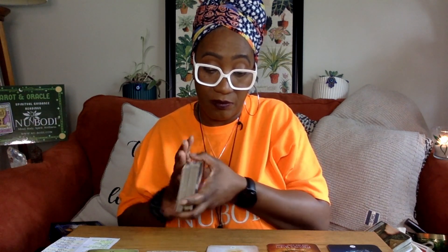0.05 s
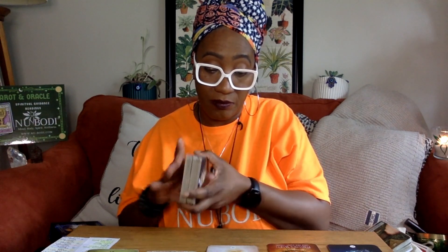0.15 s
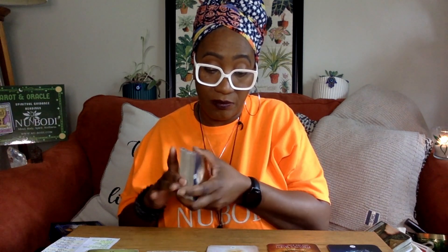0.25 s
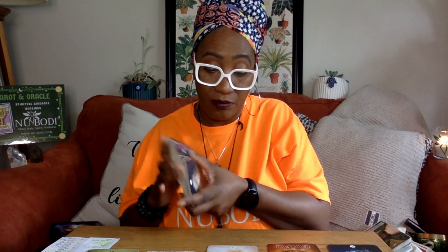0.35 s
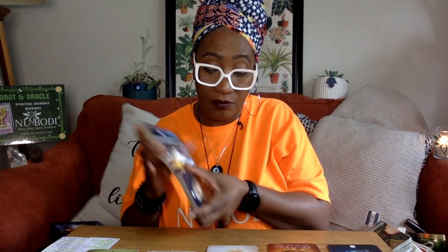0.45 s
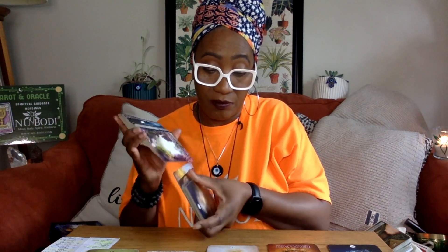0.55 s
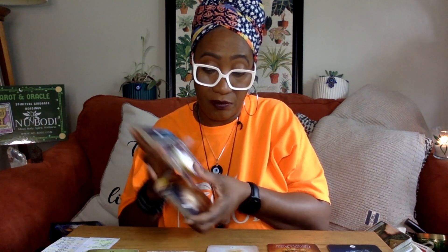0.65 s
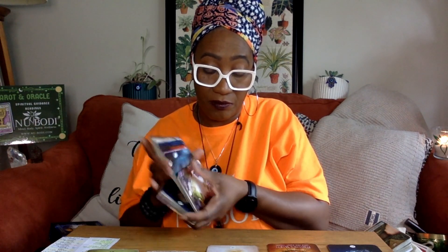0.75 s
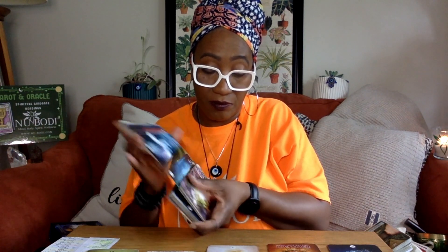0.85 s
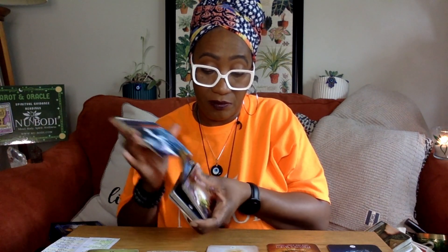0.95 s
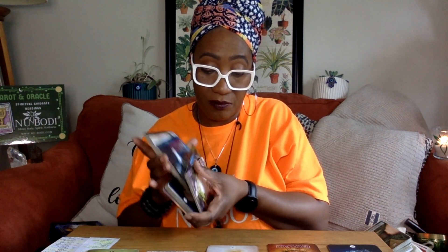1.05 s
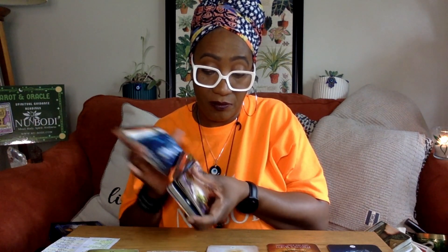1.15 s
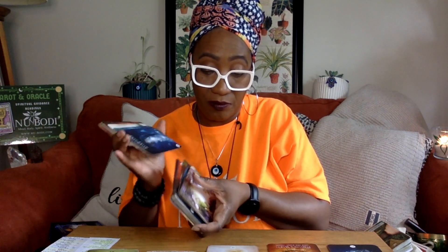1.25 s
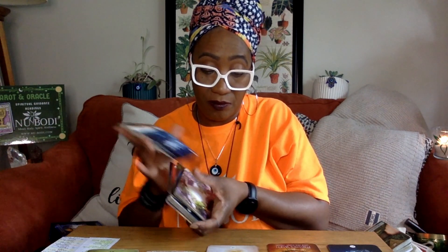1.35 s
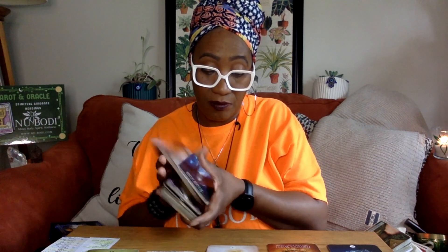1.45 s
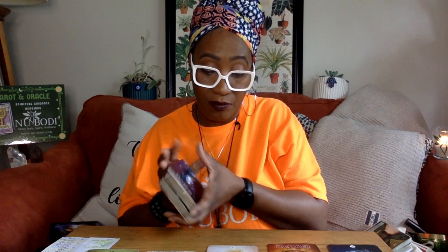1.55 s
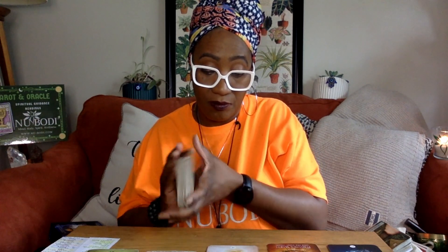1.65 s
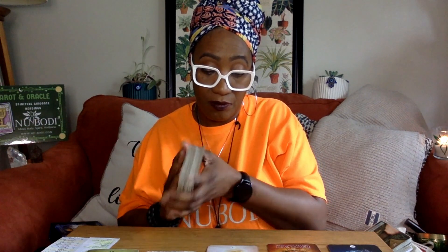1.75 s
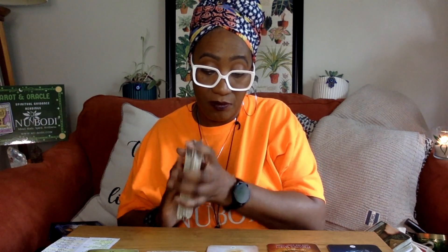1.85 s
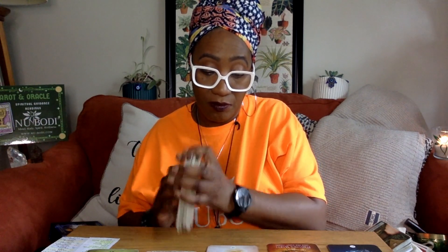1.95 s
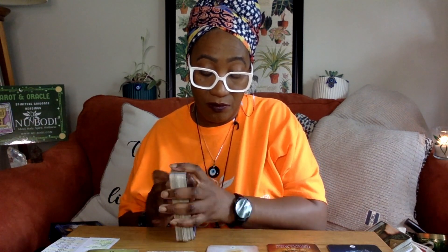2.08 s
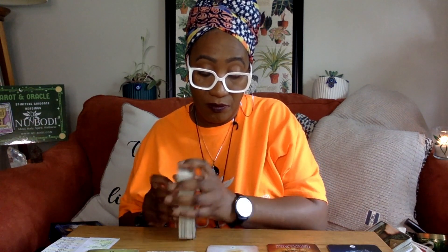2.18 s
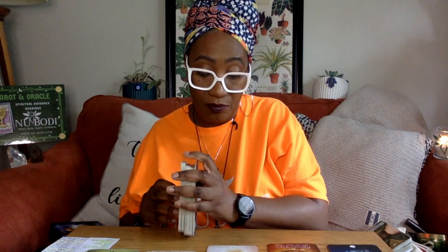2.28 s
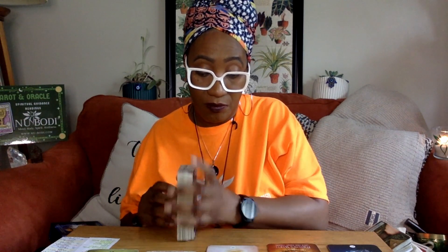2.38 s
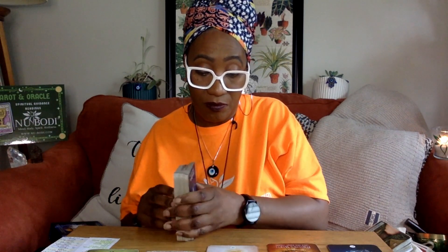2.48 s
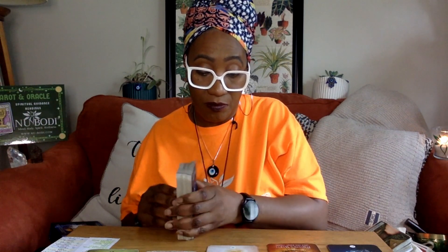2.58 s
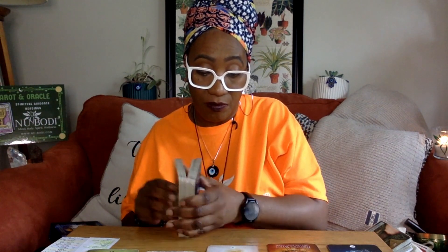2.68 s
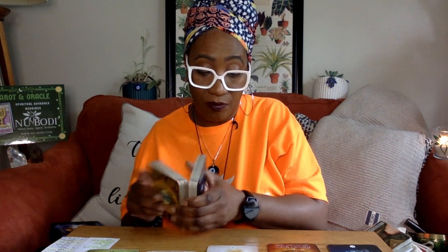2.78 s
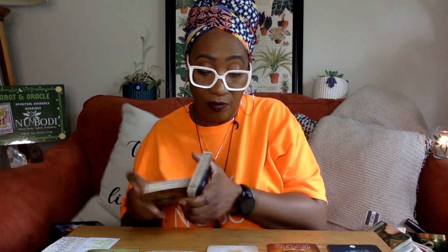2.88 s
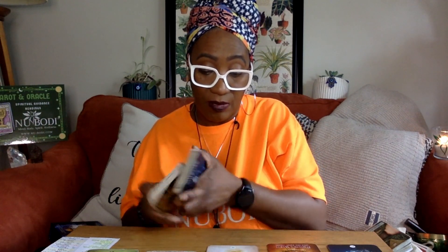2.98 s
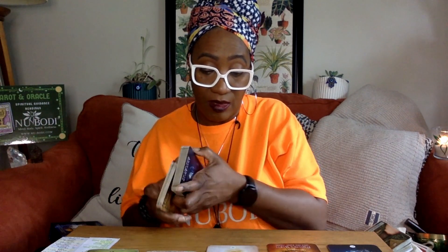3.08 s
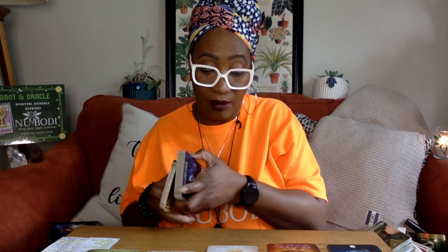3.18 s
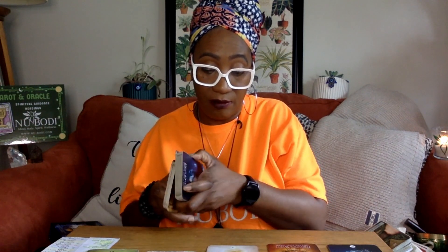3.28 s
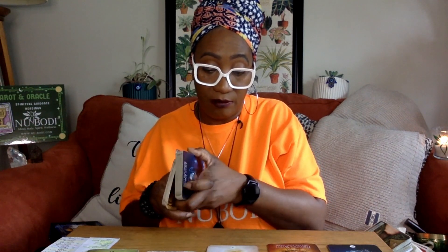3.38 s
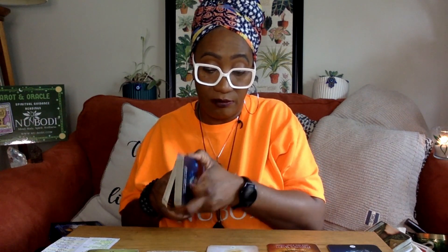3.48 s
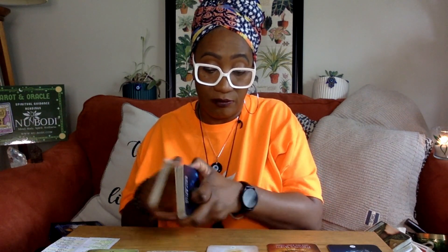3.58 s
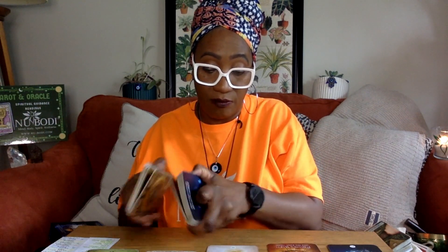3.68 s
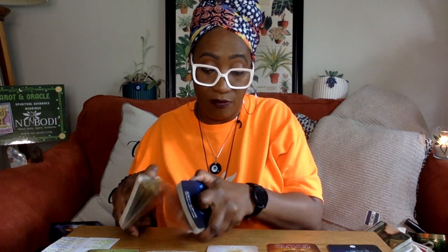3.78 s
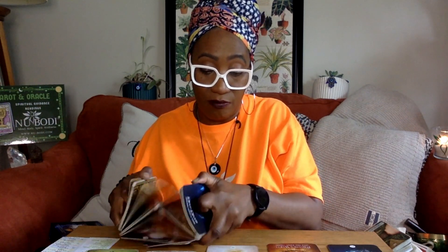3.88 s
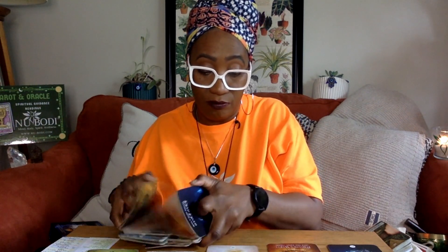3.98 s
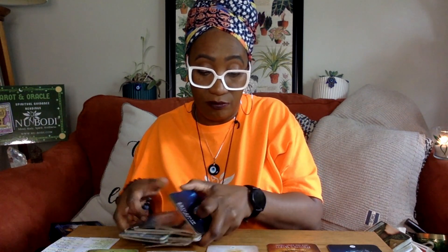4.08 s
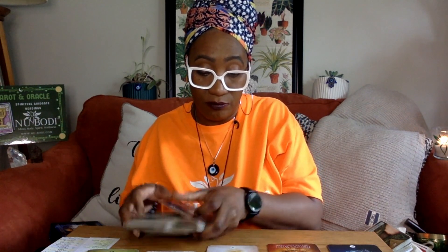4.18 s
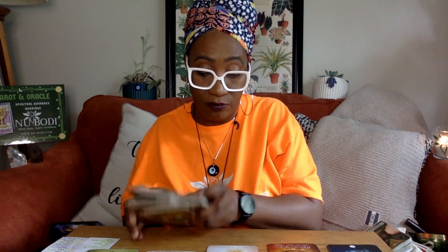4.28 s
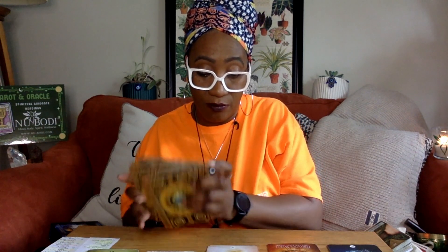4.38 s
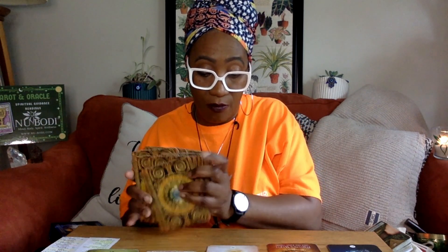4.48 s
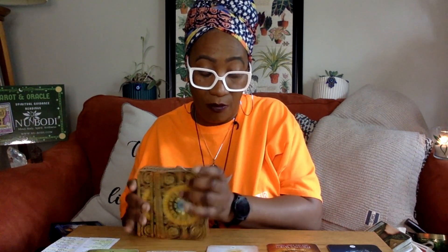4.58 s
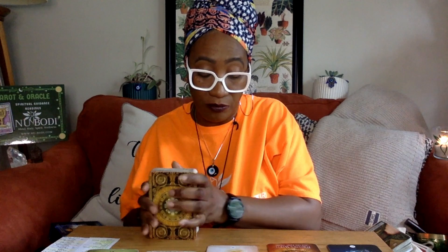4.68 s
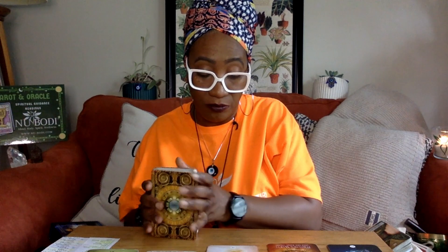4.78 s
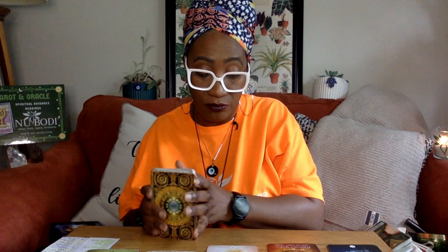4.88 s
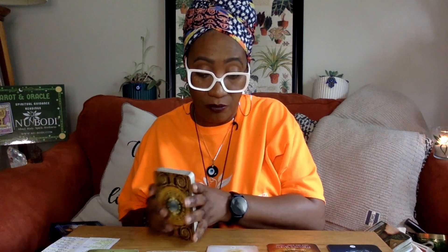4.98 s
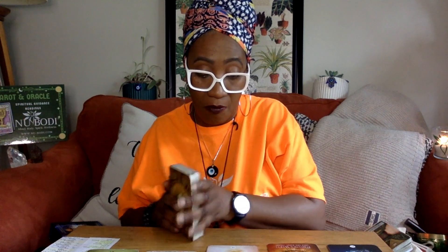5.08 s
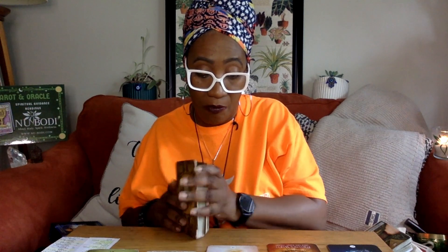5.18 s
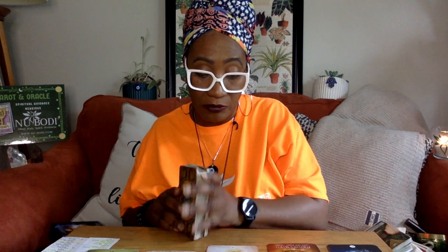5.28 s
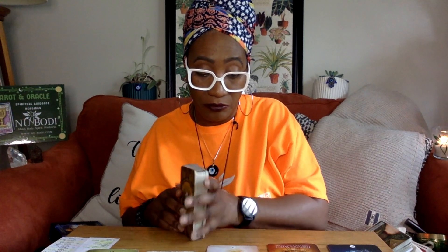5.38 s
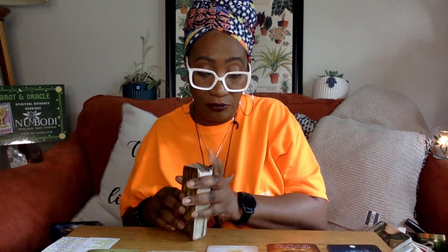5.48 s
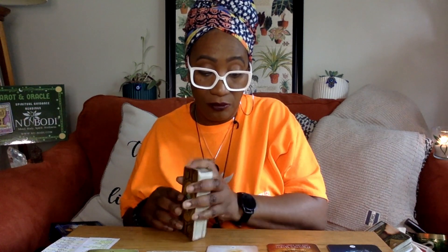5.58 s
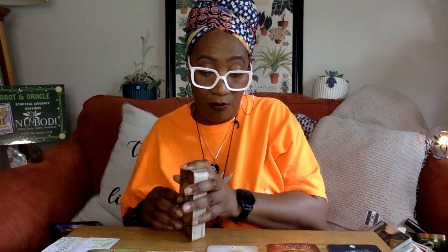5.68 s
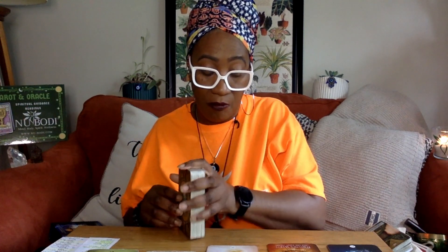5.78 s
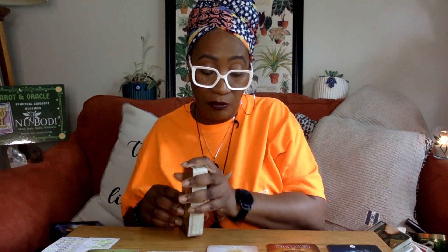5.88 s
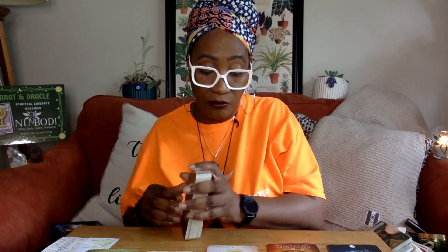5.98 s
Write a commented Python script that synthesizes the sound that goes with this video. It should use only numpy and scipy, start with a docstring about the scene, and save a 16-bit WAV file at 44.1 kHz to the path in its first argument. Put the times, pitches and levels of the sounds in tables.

```python
"""In a small furnished room, a deck of large cards is shuffled in the hands and knocked on a wooden table.
Sliding cards are noise shaped into a papery scrape and a high fizz, and snapping corners are short sines
with a flutter and a tick. Each knock is a burst of noise grains, many edges landing within moments,
that rings the table top. The room answers with echoes, over a faint hum, rumble and microphone hiss."""
import sys
import numpy as np
from scipy import signal
from scipy.fft import rfft, irfft
from scipy.io import wavfile
from scipy.ndimage import uniform_filter1d

SR = 44100
rng = np.random.default_rng(int(sys.argv[2]) if len(sys.argv) > 2 else 0)


def file_out(sig):
    """Save sig as 16-bit WAV at sys.argv[1]."""
    # one column per channel
    cols = np.atleast_2d(sig).T
    # limit, then scale
    lim = np.clip(cols, -1, 1)
    pcm = np.round(lim * 32767).astype(np.int16)
    wavfile.write(sys.argv[1], SR, pcm)


N = 266754  # length of the scene [samples]

# tone of cards rubbing, low and high part: (frequency [Hz], relative level [dB])
SCRAPE_TONE = [(180, -33), (300, -2.5), (387, -7), (846, -7.5), (2200, -6.5), (4500, -5), (6550, -20.5),
               (7500, -22.5), (9750, -91), (16500, -120)]
FIZZ_TONE = [(3820, -44), (6500, -21), (9620, -9.5), (10600, -8.5), (15100, -5), (16000, -8.5)]
# strokes of cards over cards or fingers: (time of the height [s], rise [s], fall [s], scrape level [dB],
# fizz level [dB], ringing pitch of the gap between cards [Hz], hollowness [0-1])
CARD_STROKES = [(0, .01, 0.018, -45.5, -56, 2100, 0.53), (.085, 0.13, 0.067, -70.5, -59.5, 2000, 0.2),
                (.18, .025, .025, -78, -66, 1550, .5), (.24, .03, 0.028, -71, -60.5, 1270, .5),
                (.38, .02, .05, -62, -63, 1250, 0.7), (.425, 0.044, 0.044, -59.5, -57.5, 1077, 0.5),
                (.462, .03, 0.025, -59, -57.5, 1900, 0.86), (.538, 0.071, 0.024, -80, -57, 1350, .5),
                (0.598, 0.0052, 0.013, -50.5, -55, 2080, 0.03), (.712, 0.0066, 0.028, -54, -55, 1130, 0.6),
                (.775, .02, 0.031, -54.5, -56, 2005, 0.07), (.87, 0.049, 0.061, -80, -62.5, 1300, .6),
                (.995, 0.026, .06, -72, -62.5, 1400, 0.4), (1.15, 0.051, 0.04, -62, -57.5, 2100, 0.1),
                (1.45, .012, 0.036, -59, -57.5, 2560, 0.5), (1.497, 0.018, 0.052, -51.5, -50, 2280, 0.2),
                (1.54, 0.029, 0.02, -51, -65, 2226, 0.56), (1.69, 0.11, 0.066, -66, -59.5, 2200, 0),
                (1.745, 0.026, 0.039, -66.5, -63, 1790, 0.1), (1.92, 0.071, .1, -70.5, -65, 1220, .5),
                (2.05, 0.013, 0.042, -45, -56, 1970, 0.4), (2.24, 0.043, 0.35, -73.5, -73, 1200, 0.7),
                (2.845, 0.033, 0.033, -62, -60, 2400, 0.2), (2.915, 0.0093, 0.031, -56.5, -62, 2400, 0.25),
                (3.015, 0.094, 0.037, -60.5, -58, 2300, 0.4), (3.075, .03, 0.044, -71, -61, 1440, .5),
                (3.255, 0.044, 0.02, -66.5, -65, 2700, .8), (3.37, .02, .04, -66, -78, 1510, 1),
                (3.45, 0.022, 0.071, -63.5, -58, 3530, 0.4), (3.74, 0.072, .04, -69.5, -77, 1900, .5),
                (3.815, 0.026, 0.045, -60.5, -63, 1950, 0.5), (4.23, 0.12, 0.087, -57.5, -61.5, 2200, 0.06),
                (4.31, 0.054, 0.081, -79, -62, 2570, 0.3), (4.435, 0.065, 0.053, -57.5, -56, 2300, .2),
                (4.61, 0.053, 0.058, -56.5, -53.5, 2000, .4), (4.72, 0.03, 0.03, -47, -51, 2240, 0.7),
                (4.815, .03, 0.04, -79, -60.5, 2000, .4), (5.015, 0.087, 0.06, -68, -61.5, 2000, 0.2),
                (5.19, 0.24, 0.062, -70, -67.5, 2010, .5), (5.27, .02, 0.032, -57, -76.5, 900, 0.86),
                (5.982, .008, .04, -64, -77.5, 2020, .5)]


def gain_of(db):
    """Turns decibels into a factor for the wave."""
    return 10 ** (np.asarray(db) / 20)


def evened(x):
    """Scales to an average (rms) strength of 1."""
    return x / np.sqrt(np.mean(x ** 2) + 1e-20)


def unit(x):
    """Scales to energy 1."""
    return x / np.linalg.norm(x)


def read(points, hz):
    """Reads a table at any frequency, with pitch spaced as the ear hears it (logarithmic)."""
    f, value = np.transpose(points)
    return np.interp(np.log(hz + 1), np.log(f + 1), value)


def add(mix, s, sound):
    """Adds a sound to the mix at s seconds, cut off at the end of the mix."""
    part = mix[round(s * SR):][:len(sound)]
    part += sound[:len(part)]


def colour(points, size=4096):
    """Makes a filter with the given tone and energy 1; it never sounds ahead of its input."""
    hz = abs(np.fft.fftfreq(size, 1 / SR))
    log_gain = np.log(gain_of(np.maximum(read(points, hz), -100)))
    # this phase packs the energy as early as possible
    phase = -signal.hilbert(log_gain).imag
    taps = np.fft.ifft(np.exp(log_gain + 1j * phase)).real[:size // 2]
    return unit(taps)


def grains(size, spread_db):
    """Noise whose samples differ in size by spread_db: the wider, the more like a rain of tiny clicks."""
    boost_db = spread_db * np.minimum(rng.exponential(1, size), 5)
    return evened(rng.standard_normal(size) * gain_of(boost_db))


def resonate(x, hz, width):
    """A resonance of gain 1: shifts the pitch hz (fixed or moving) to zero, smooths, and shifts back."""
    turn = np.exp(2j * np.pi * np.cumsum(hz * np.ones(len(x))) / SR)
    r = np.exp(-np.pi * width / SR)
    smooth = signal.lfilter([1 - r], [1, -r], x / turn + 1e-18)
    return 2 * (turn * smooth).real


def floor():
    """Room rumble and microphone hiss are shaped noise; hum tones are sines, the higher wavering more."""
    # tone of rumble and hiss: (frequency [Hz], relative level [dB])
    floor_tone = [(15, -4.5), (30, -1), (42, -4.5), (52, -10.5), (80, -1), (135, -1), (163, -15),
                  (234, -10.5), (350, -11.5), (430, -19.5), (720, -23.5), (1150, -16), (1400, -26.5),
                  (2200, -24.5), (4000, -27.5), (7310, -35.5), (10000, -30), (13500, -24.5), (16000, -23.5)]
    # hum tones: (frequency [Hz], level around which it wavers [dB rms])
    hum_tones = [(26.9, -71), (59.2, -64), (119, -83), (242.2, -76)]
    floor_db = -59  # rms
    t = np.arange(N) / SR
    spectrum = rfft(rng.standard_normal(N))
    hiss = irfft(spectrum * gain_of(read(floor_tone, np.fft.rfftfreq(N, 1 / SR))), N)
    hum = np.zeros(N)
    for hz, db in hum_tones:
        waver_db = hz / 100 * evened(uniform_filter1d(rng.standard_normal(N), size=8000))
        sine = np.sin(2 * np.pi * (hz * t + rng.random()))
        hum += np.sqrt(2) * gain_of(db + waver_db) * sine
    return gain_of(floor_db) * evened(hiss) + hum


def room(x):
    """Walls send back many echoes: sparse taps of random sign, each band dying at its own speed."""
    # (frequency [Hz], time to die away by 60 dB [s])
    room_decay = [(200, 0.32), (600, 0.33), (1300, 0.38), (1750, 0.25), (2150, 0.33), (2700, 0.3),
                  (4000, 0.27), (10000, 0.19)]
    taps = np.zeros(SR // 2)
    # one echo at a random place in every 20 samples
    at = np.arange(100, len(taps) - 20, 20)
    taps[at + rng.integers(0, 20, len(at))] = rng.choice([-1., 1.], len(at))
    hz, t, z = signal.stft(taps, SR, nperseg=256)
    fade = gain_of(-60 * t / read(room_decay, hz)[:, None])
    tail = signal.istft(z * fade, SR, nperseg=256)[1]
    return signal.fftconvolve(x, unit(tail))[:N]


def pressure(t):
    """Gain of scrape and fizz: each stroke swells to its height and dies away; the cascade joins them."""
    # half the deck spilling onto the table: (time [s], scrape level [dB], fizz level [dB])
    cascade = [(3.848, -70, -68), (3.853, -53, -48), (3.89, -46.5, -51), (3.924, -43.5, -48.5),
               (3.954, -53, -55), (3.967, -40.5, -45), (3.987, -46.5, -50), (4.022, -47.5, -49),
               (4.036, -44.5, -48), (4.06, -46, -47.5), (4.088, -40, -42.5), (4.136, -55.5, -58.5),
               (4.18, -59, -62)]
    drop_db = 11  # level lost over one rise or fall time
    s, *levels_db = np.transpose(cascade)
    gains = [gain_of(np.interp(t, s, db, -200, -200)) for db in levels_db]
    for s, rise, fall, *levels_db in np.array(CARD_STROKES)[:, :-2]:
        # distance from the height, counted in rise or fall times
        away = np.maximum((s - t) / max(rise, .002), (t - s) / max(fall, .002))
        strokes = [gain_of(db - drop_db * away) for db in levels_db]
        gains = [np.hypot(gain, stroke) for gain, stroke in zip(gains, strokes)]
    return gains


def sliding():
    """Card faces catch and slip: a low scrape and a high fizz that flicker together."""
    t = np.arange(N) / SR
    coarse = np.arange(0, N, 32) / SR
    scrape_gain, fizz_gain = (np.interp(t, coarse, gain) for gain in pressure(coarse))
    s, *_, gap_hz, hollow = np.transpose(CARD_STROKES)
    gap_hz = np.interp(t, s, gap_hz)
    hollow = np.clip(np.interp(t, s, hollow), 0, 1)

    # random flicker of 3 dB rms
    catch = gain_of(3 * evened(uniform_filter1d(rng.standard_normal(N), size=250)))
    rub = grains(N, spread_db=5.0) * catch
    rub = evened(signal.oaconvolve(rub, colour(SCRAPE_TONE))[:N])
    # the air between the cards rings
    wedge = resonate(rub, gap_hz, width=1200)
    wedge = resonate(wedge, gap_hz, width=1200)
    scrape = np.sqrt(1 - hollow) * rub + np.sqrt(hollow) * evened(wedge)

    # the fizz flickers less
    fizz = grains(N, spread_db=3.5) * catch ** 0.28
    fizz = evened(signal.oaconvolve(fizz, colour(FIZZ_TONE))[:N])
    return scrape * scrape_gain, fizz * fizz_gain


def snaps():
    """A bent card lets go: a few cycles of flexing, with a brief flutter and a crisp edge tick at once."""
    # (time [s], flex level [dB], pitch [Hz], edge tick level [dB], cycles of ring)
    card_snaps = [(.5886, -33, 2000, -42, .7), (.7032, -40, 1060, -53, 1.2), (.762, -48, 3800, -58, 1.2),
                  (1.1233, -55, 2140, -52, 1.2), (1.439, -50, 3000, -58, 1.2),
                  (1.4905, -33, 2300, -44, 1.1), (1.5338, -35, 2700, -56, 1.5),
                  (1.5413, -39, 1600, -58, 1.5), (2.387, -40, 4000, -54, .8), (2.417, -40, 3600, -60, 2),
                  (2.846, -52, 2600, -62, 1.2), (2.914, -52, 2800, -60, 1.5), (2.9665, -38, 2010, -56, 1.2),
                  (3.238, -52, 2600, -60, 1.2), (3.259, -48, 1900, -66, 2), (3.277, -58, 2500, -46, .9),
                  (3.8491, -16, 3300, -27, 1.6), (3.8657, -8.5, 2300, -38, 1.0),
                  (3.9606, -27, 2250, -40, 2.5), (3.9786, -38, 2300, -38, 1.3),
                  (4.0295, -32, 1900, -40, 1.3), (4.0705, -32, 2190, -42, 4), (4.0832, -27, 2460, -44, 2.5),
                  (4.4307, -27, 2280, -45, 4), (4.431, -29, 2900, -60, 4), (4.8253, -13, 1800, -56, .5)]
    # flutter level at a 0 dB snap, dB of flutter per dB of snap, and its fading time
    flutter_db, flutter_growth, flutter_s = -31.5, 0.38, 0.0021
    out, t = np.zeros(N), np.arange(1500) / SR
    scrape, fizz = colour(SCRAPE_TONE), colour(FIZZ_TONE)
    for s, db, hz, edge_db, cycles in card_snaps:
        onset = 1 - np.exp(-t / .0001)
        flex = np.sin(2 * np.pi * hz * t) * np.exp(-t * hz / max(cycles, .3)) * onset
        rattle = signal.fftconvolve(rng.standard_normal(1500), scrape)[:1500]
        flutter = evened(rattle + resonate(rattle, hz, width=5400)) * np.exp(-t / flutter_s)
        burst = rng.standard_normal(1500) * np.exp(-t / 0.0016)
        tick = signal.fftconvolve(burst, fizz)[:1500]
        flutter_gain = gain_of(flutter_db + flutter_growth * db)
        add(out, s, gain_of(db) * flex + flutter_gain * flutter + gain_of(edge_db) * tick)
    return out


def ringing(modes, t):
    """A struck board rings at several pitches: one row of dying sine for each."""
    return np.array([gain_of(db - 60 * t / t60) * np.sin(2 * np.pi * hz * t) for hz, db, t60 in modes])


def knocks():
    """Card edges land in a quick clatter that rings the table, and the table sways."""
    # (time [s], clatter level [dB], rise [s], landing spread [s], deck ring [Hz],
    # edge crackle over the clatter level [dB], thud peak [dB], thud centre [Hz], low boom [dB])
    deck_knocks = [(1.571, -72, .002, 0.0093, 1200, -13, -48.5, 330, -64.5),
                   (2.0344, -20.5, 0.0025, .015, 1950, -15.5, -22.5, 380, -70),
                   (2.049, -22.5, .004, 0.018, 2020, -21, -26.5, 338, -41.5),
                   (2.067, -37, .003, 0.012, 2250, -28, -33, 357, -70.5),
                   (2.33, -71, 0.01, 0.062, 702, -18, -50, 300, -62),
                   (2.387, -36, 0.00059, 0.018, 1010, -16, -40.5, 300, -47.5),
                   (2.415, -36, 0.0011, 0.026, 2000, -21, -38, 241, -50.5),
                   (3.851, -38.5, .001, 0.02, 1200, -18, -44, 440, -64),
                   (3.875, -35, 0.0038, 0.0085, 1650, -2.5, -52, 290, -46),
                   (4.023, -34.5, 0.0034, 0.011, 1820, -9, -42, 390, -54.5),
                   (4.368, -55.5, 0.01, 0.022, 900, -6.5, -60, 400, -61),
                   (4.571, -30.5, .0006, .008, 1260, -14.5, -31, 400, -54),
                   (4.586, -22.5, 0.0013, 0.0085, 1070, -7.5, -36, 300, -57.5),
                   (4.594, -19.5, 0.0041, 0.015, 2000, -11.5, -21.5, 420, -51),
                   (4.608, -19, 0.0072, 0.02, 1260, -13, -28, 300, -63),
                   (4.672, -41, .001, 0.0053, 2200, 1, -51, 300, -74),
                   (4.823, -33.5, 0.0021, 0.022, 1340, -12, -40.5, 272, -56),
                   (4.95, -57, 0.025, 0.044, 2100, -2, -40, 225, -58),
                   (5.19, -50, 0.00052, 0.02, 836, -12.5, -47, 350, -74),
                   (5.291, -41, 0.00085, 0.029, 1430, -16, -39.5, 223, -49),
                   (5.632, -73, 0.0019, 0.0079, 960, -23, -53.5, 408, -72),
                   (5.974, -33.5, .005, 0.02, 740, -13.5, -33.5, 200, -50)]
    # pitches of the table top: (frequency [Hz], relative level [dB], time to die away by 60 dB [s])
    table_modes = [(140, -6, 0.137), (180, -12, .1), (225.3, 7, 0.17), (297.5, 8, 0.12), (356.5, 7, .15),
                   (437, 8, .1), (572, -10, 0.08), (654, 0, .1)]
    # slow sway of the table: (frequency [Hz], level over the low boom [dB], time to its height [s])
    sway_modes = [(76, 0, .072), (86, -9, .05)]
    # the deck's dull body and the crackle of its card edges: (frequency [Hz], relative level [dB])
    deck_tone = [(200, 1), (500, 0.5), (1000, 2.5), (2300, 2.5), (2900, -8), (5000, -33), (9000, -33),
                 (16000, -109)]
    crackle_tone = [(1500, -64), (2800, 8), (3900, 6.5), (4500, -10.5), (6000, -15.5), (9000, -65),
                    (16000, -32.5)]

    out, sway, t = np.zeros(N), np.zeros(N), np.arange(SR // 2) / SR
    plate = ringing(table_modes, t)
    mode_hz = np.array(table_modes)[:, :1]
    deck, crackle = colour(deck_tone), colour(crackle_tone)
    u = t[:8000]
    for s, db, rise, spread, ring_hz, crackle_db, thud_db, thud_hz, boom_db in deck_knocks:
        # how strongly the edges land: a short rise, then a dying away
        late = np.maximum(u - rise, 0) / max(spread, .001)
        landing = np.minimum(u / max(rise, .0003), 1) * np.exp(-late ** 1.4)
        blow = gain_of(db) * np.linalg.norm(landing)

        clatter = grains(8000, spread_db=0.0) * landing
        body = signal.fftconvolve(clatter, deck)
        add(out, s, blow * unit(body + 0.9 * resonate(body, ring_hz, width=400)))

        edges = signal.fftconvolve(grains(8000, spread_db=8.5) * landing, crackle)
        add(out, s, blow * gain_of(crackle_db) * unit(edges))

        # the spot that is struck favours the table modes near thud_hz: 13 dB less per octave away
        near = gain_of(-13 * abs(np.log2(mode_hz / thud_hz)))
        # the step from sample to sample favours the higher pitches
        thud = np.diff(signal.fftconvolve(clatter, (near * plate).sum(0)))
        add(out, s, gain_of(thud_db) * thud / abs(thud).max())

        for hz, share_db, height in sway_modes:
            swell = (t / height * np.exp(1 - t / height)) ** 2
            wave = np.sin(2 * np.pi * hz * (s + t))
            add(sway, s, gain_of(boom_db + share_db) * swell * wave)
    return out, sway


def scene():
    """Adds the room to knocks, snaps and scrape, then joins the sway, the fizz and the background."""
    room_db = -11
    scrape, fizz = sliding()
    knock, sway = knocks()
    near = knock + snaps() + scrape
    cards = near + gain_of(room_db) * room(near)
    # knocks, snaps and scrape keep little below 85 Hz; the table's sway carries the deep part
    low_cut = signal.butter(4, 85, "high", fs=SR, output="sos")
    cards = signal.sosfilt(low_cut, cards)
    return (cards + sway + fizz + floor())[None]


def record(dry):
    """The band limit of the recorder: a steep filter takes away the highest treble."""
    edge_hz = 15800
    taps = signal.firwin(511, edge_hz, window=("kaiser", 9), fs=SR)
    return signal.oaconvolve(dry, taps[None], "same")


dry = scene()
out = record(dry)
file_out(out)
```